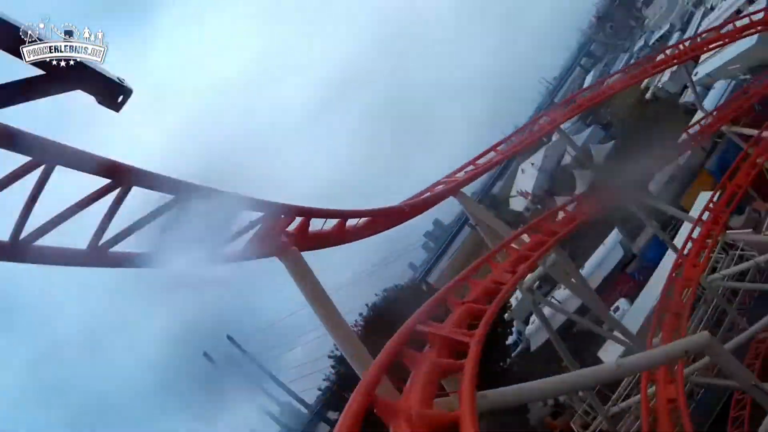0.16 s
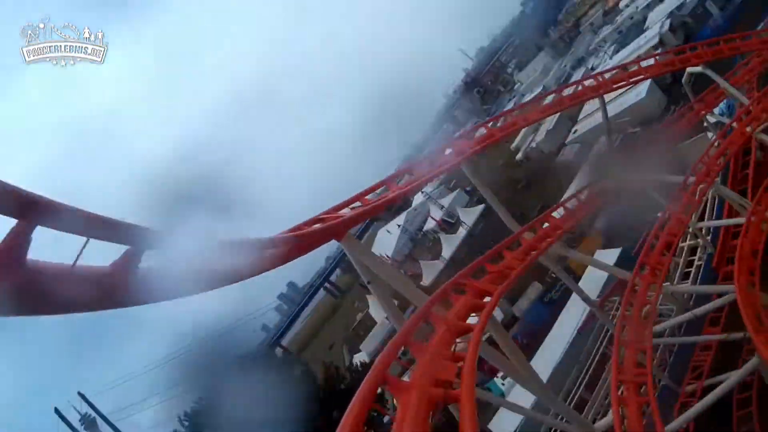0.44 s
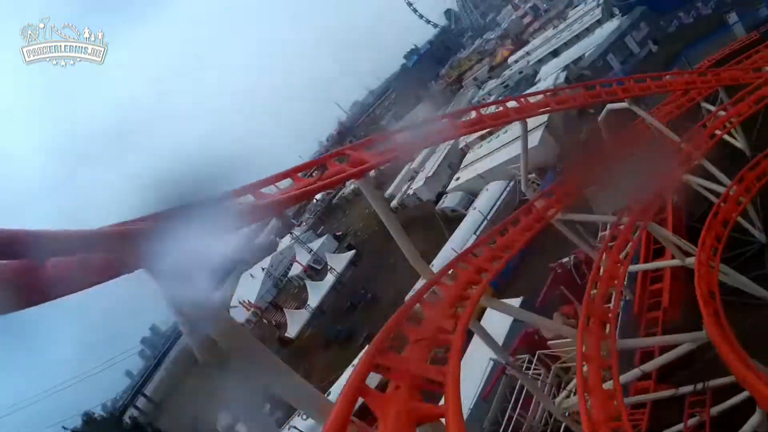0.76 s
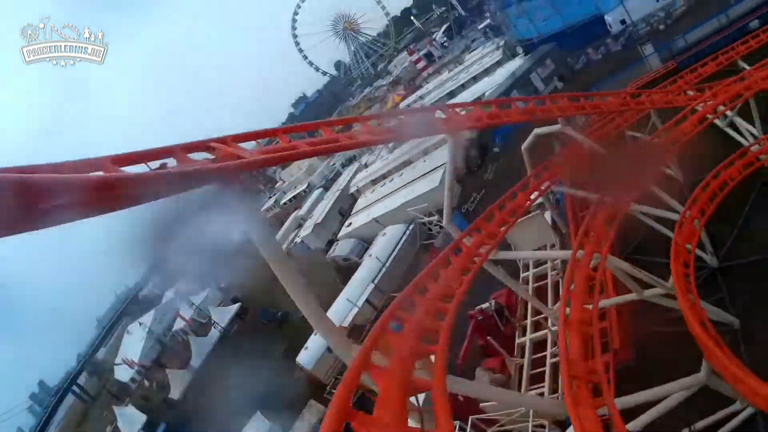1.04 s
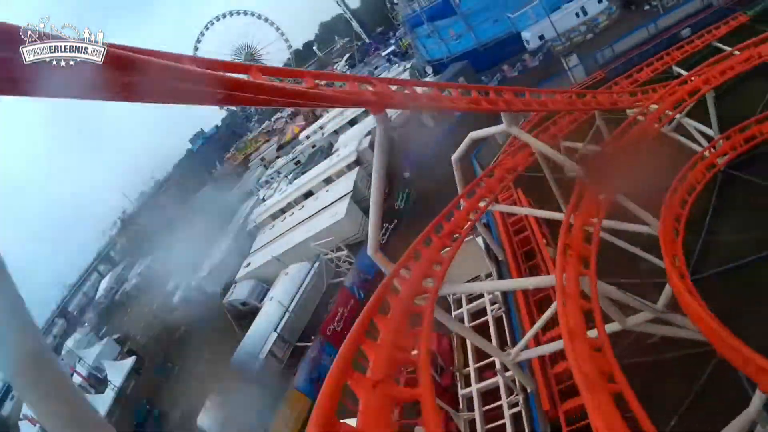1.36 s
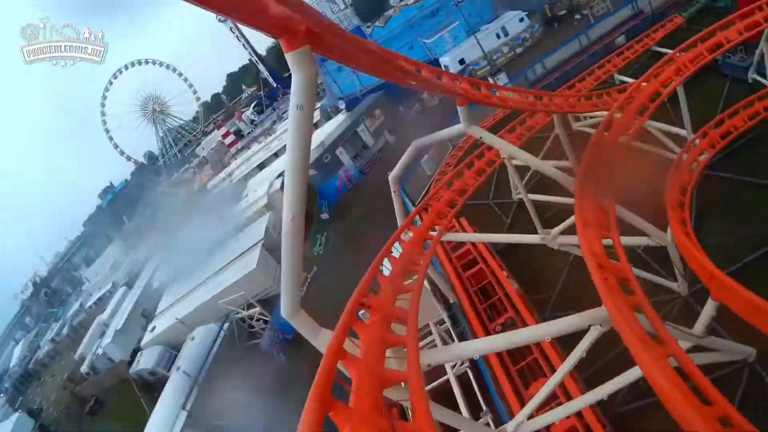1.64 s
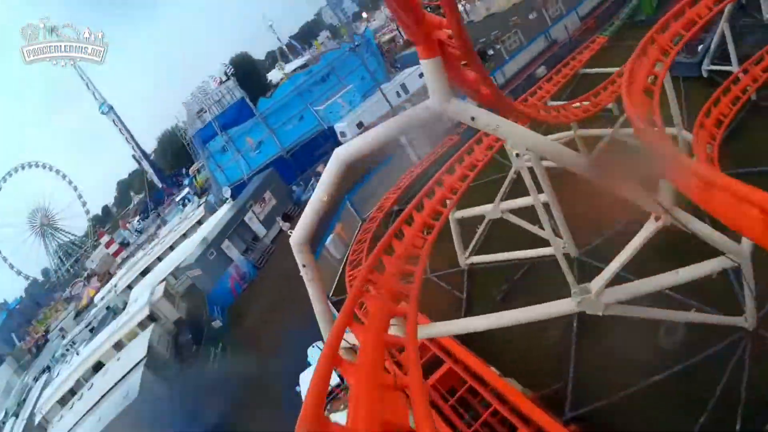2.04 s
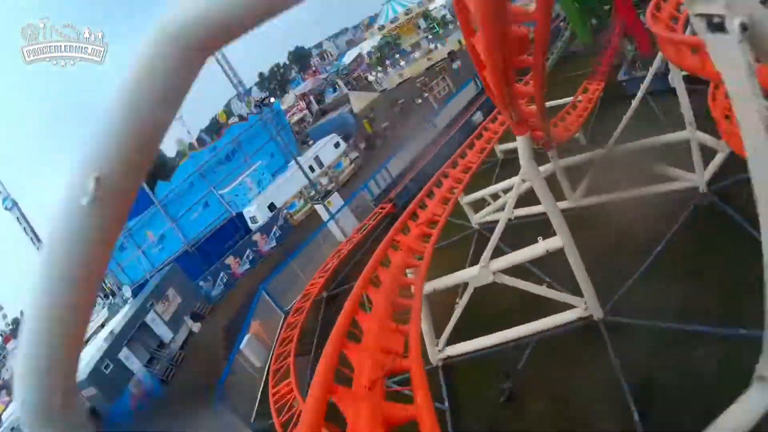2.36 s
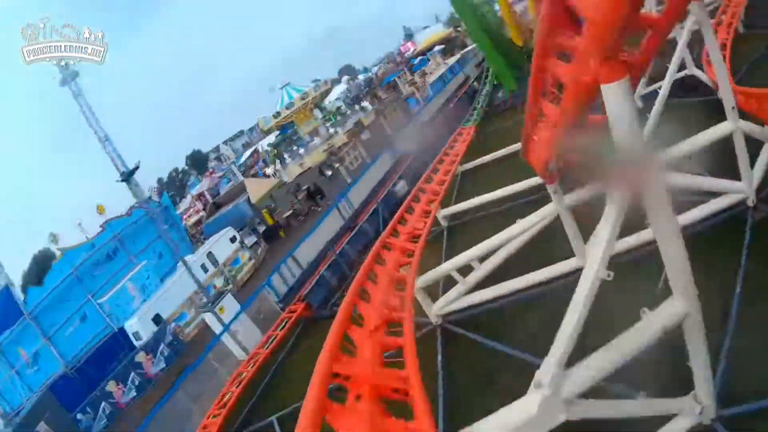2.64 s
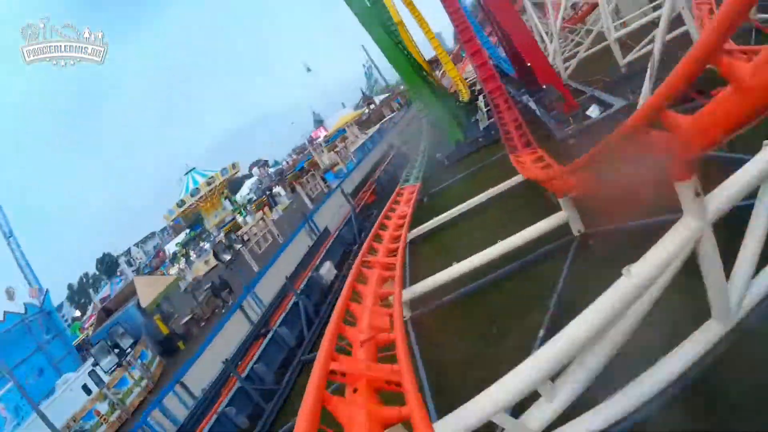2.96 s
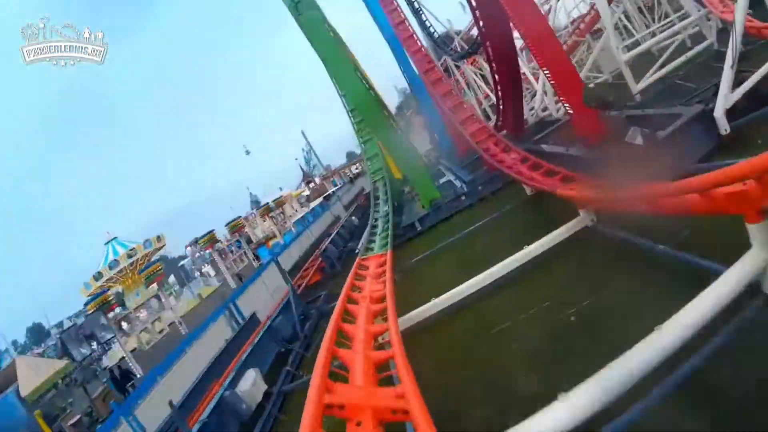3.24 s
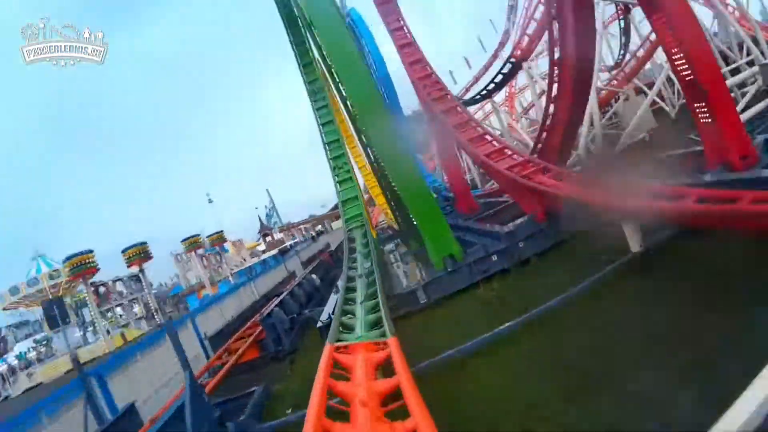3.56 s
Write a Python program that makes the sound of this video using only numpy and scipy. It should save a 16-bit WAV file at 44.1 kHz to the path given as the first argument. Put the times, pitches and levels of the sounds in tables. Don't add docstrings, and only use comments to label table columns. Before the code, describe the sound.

On-board roller coaster ride: deep, fluttering wind buffets a cased microphone from the start, over a quieter wheel roar and a faint rising whine in the first 1.5 s. Grit and fine rain tick on the plastic, with harder knocks near 0.24, 1.16, 1.47, 2.23 and 3.63 s. Blunt track thumps begin at 0.4 s, briefly choking the wind, and crowd together from 3.3 s as gusts strengthen, almost overloading.

```python
import sys
import numpy as np
from scipy import signal
from scipy.fft import rfft, irfft
from scipy.io import wavfile
from scipy.ndimage import uniform_filter1d

SR = 44100
rng = np.random.default_rng(int(sys.argv[2]) if len(sys.argv) > 2 else 0)


def bounce(signal):
    frames = np.transpose(np.atleast_2d(signal))
    limited = np.clip(frames, -1, 1)
    pcm = np.round(limited * 32767).astype(np.int16)
    wavfile.write(sys.argv[1], SR, pcm)


def gain_from_db(level_db):
    decades = np.asarray(level_db, float) / 20
    return 10 ** decades


N = 163170
LATE_S, CONTACT_S = 0.0012, 0.00045
CRACK_DB = 11


def col(table, k):
    a = np.array(table)
    return np.interp(np.arange(N) / SR, a[:, 0], a[:, k])


def unit(x):
    return x / np.sqrt(np.mean(x ** 2))


def walk(rate_per_s):
    k = int(SR / rate_per_s)
    held = np.repeat(rng.standard_normal(N // k + 1), k)
    slewed = uniform_filter1d(uniform_filter1d(held, k), k)[:N]
    return unit(slewed - uniform_filter1d(slewed, size=5 * k))


def bands(shape, low_hz, count):
    f = np.maximum(np.arange(N // 2 + 1) * SR / N, 1)
    s = np.array(shape)
    gain = gain_from_db(np.interp(np.log(f), np.log(s[:, 0]), s[:, 1], left=-60, right=-90))
    for hz in low_hz * 2 ** (np.arange(count) / 3):
        window = np.cos(np.clip(3 * np.log2(f / hz), -1, 1) * np.pi / 2)
        yield hz, irfft(rfft(rng.standard_normal(N)) * gain * window, N)


def add(out, start_s, x):
    i = int(start_s * SR)
    out[i:i + len(x)] += x[:max(N - i, 0)]


def ring(hz, t60_s, rise_s):
    t = np.arange(int(t60_s * SR)) / SR
    decay = np.exp(-t * np.log(1000) / t60_s)
    return np.sin(2 * np.pi * hz * t) * decay * (1 - np.exp(-t / rise_s))


def surge(octaves):
    # centre in seconds, swell in dB, half-width in seconds, brightening in dB per octave
    throws = [(0.242, 0, 0.14, 2), (0.431, 4.5, .04, -0.5), (0.601, 5.5, 0.039, -1.7),
              (1.011, 5.5, 0.051, 2.5), (1.142, 4.5, 0.037, -0.5), (1.447, 6.5, 0.018, 2.5),
              (1.68, 1.5, 0.067, 2), (1.779, 1, 0.04, 1.5), (1.978, 8.5, 0.036, 2.5),
              (2.091, 5, 0.046, -0.5), (2.39, 2.5, 0.022, 6), (2.519, 1.5, 0.014, 1.5),
              (2.772, 1.5, 0.019, 3.8), (3.09, 0.5, 0.03, 2.5), (3.359, 7, 0.014, 2.5),
              (3.459, 3.5, 0.019, 3), (3.592, 7.5, 0.019, 2)]
    t = np.arange(N) / SR
    return sum((db + tilt * octaves) * np.exp(-.5 * ((t - s) / w_s) ** 2) for s, db, w_s, tilt in throws)


def wind(eddy):
    # time in seconds, buffeting level in dB
    gust_levels = [
        (0.0, -16),
        (2.07, -15.5),
        (2.19, -15),
        (3.48, -12.5),
        (3.7, -9.5),
    ]
    # frequency in Hz, level in dB per Hz
    buffet_spectrum = [(13, -38), (22, -2), (87, 1.5), (278, -3.5), (387, -5.5), (538, -13.5), (597, -12.5),
                       (1240, -35), (1400, -37), (1820, -71), (3080, -120)]
    shared_db, near_db, own_db = 1.3, 1, 1
    sway_per_s, flicker_per_s = 35, 40
    eddy_from_hz, suction = 200, .12
    out, near, swell = 0, walk(sway_per_s), surge(0)
    tilt = surge(0.53) - swell
    for hz, x in bands(buffet_spectrum, 21.79, count=19):
        near = unit(0.53 * near + 0.9 * walk(sway_per_s))
        level_db = shared_db * eddy / (1 + eddy_from_hz / hz) + near_db * near
        level_db = level_db + own_db * walk(flicker_per_s)
        out = out + x * gain_from_db(level_db + swell + tilt * np.log2(hz / 186.0))
    calm_rms = np.sqrt(np.mean((out / gain_from_db(swell)) ** 2))
    out = out / calm_rms * gain_from_db(col(gust_levels, 1) - 0.56)
    bend = out ** 2
    return out - suction * (bend - uniform_filter1d(bend, size=2000))


def wheels(eddy):
    # frequency in Hz, level in dB per Hz
    roar_spectrum = [(530, -39), (900, -0.5), (1260, -18), (1520, -6), (2930, -21.5), (4350, -31),
                     (5200, -38), (14400, -43), (15500, -54.5)]
    # time in seconds, treble hiss in dB
    spray_levels = [
        (0, 2.5),
        (.42, 0.5),
        (.445, 5.5),
        (.47, -1.5),
        (1.9, -4),
        (2.4, -3),
        (3.17, 0.5),
        (3.7, 0),
    ]
    # time in seconds, frequency in Hz, level in dB
    whine_track = [
        (0, 940, -56),
        (.2, 955, -40),
        (.45, 975, -43),
        (.65, 1000, -43.5),
        (.8, 1030, -58),
        (1.1, 1105, -53),
        (1.2, 1130, -44.5),
        (1.42, 1200, -54),
        (1.6, 1260, -60.5),
        (3.7, 1500, -71),
    ]
    roar_db, rise_db_per_s, steady_hz = -45.5, 0.77, 4500
    case_hz, case_width_hz, case_lift = 4050, 310, 0.95
    shake_db = 0.4 * surge(2.8) + 0.44 * eddy + 1.5 * walk(80)
    shake_db = shake_db + rise_db_per_s * (np.arange(N) - N / 2) / SR
    hiss_db = col(spray_levels, 1)
    roar = 0
    for hz, x in bands(roar_spectrum, 897, count=13):
        top = (hz / steady_hz) ** 4
        lift = 1 + case_lift / (1 + ((hz - case_hz) / case_width_hz) ** 2)
        if True:
            lift = 1 + case_lift / (1 + ((hz - case_hz) / case_width_hz) ** 4)
        roar = roar + x * gain_from_db((shake_db + hiss_db * top) / (1 + top)) * lift
    whine_hz = col(whine_track, 1) * (1 + 0.0045 * walk(20))
    whine = np.sin(2 * np.pi * np.cumsum(whine_hz) / SR)
    return unit(roar) * gain_from_db(roar_db + 3.0) + whine * gain_from_db(col(whine_track, 2) + 4.2 * walk(19))


def crack(noise, colour_db):
    # frequency in Hz, width in Hz, level in dB
    upper_resonances = [(7700, 3300, 5), (10730, 2400, 1.5), (13200, 3000, -3.5)]
    burst_s = .00025
    t = np.arange(len(noise)) / SR
    f = np.arange(len(noise) // 2 + 1) * SR / len(noise)
    shape = 0
    for k, (hz, width_hz, db) in enumerate(upper_resonances):
        shape = shape + (-1) ** k * gain_from_db(db + colour_db[k]) / (1 + 1j * (f - hz) / (width_hz / 2)) ** 2
    x = irfft(rfft(noise * t * np.exp(-t / burst_s)) * shape, len(noise))
    return x / np.abs(x).max()


def ticks():
    # start in seconds, peak in dB, crack in dB, ring in Hz
    light_taps = [(.0603, -43.5, -8, 4600), (.0725, -44, -5, 4600), (.0965, -34.5, -22.5, 4120),
                  (.1905, -41.5, -5, 5250), (.2052, -42.5, -14, 4500), (.3446, -36, -23, 3900),
                  (.4098, -33.5, -12, 4500), (.4335, -42.5, -21.5, 3900), (.478, -37.5, -16, 4270),
                  (.9318, -45.5, -15, 3900), (1.0186, -46.5, -18, 4300), (.9712, -38.5, -27.5, 3870),
                  (1.056, -38.5, -27, 4100), (1.181, -37, -23, 4050), (1.4426, -39, -30, 3600),
                  (1.4998, -48, -10, 4800), (1.7818, -39.5, -10, 4400), (1.991, -42.5, -24.5, 3500),
                  (2.1114, -47.5, -17, 4360), (2.176, -36, -19, 3900), (2.3545, -43.5, -19, 4010),
                  (2.363, -43, -21.5, 3300), (2.381, -34, -29, 3620), (2.4014, -39, -23.5, 3940),
                  (2.4359, -42, -23, 3900), (2.4713, -43.5, -22.5, 4000), (2.5726, -47.5, -20.5, 4010),
                  (2.6017, -42, -25, 3980), (2.6808, -35, -15.5, 4230), (2.7826, -43, -22, 3600),
                  (2.795, -49.5, -5.5, 4800), (2.8463, -41.5, -7.5, 5600), (2.9223, -41, -12, 4800),
                  (2.9742, -38.5, -17.5, 3950), (3.0155, -48, -23, 4100), (3.0535, -42.5, -25, 4700),
                  (3.236, -32.5, -23, 4100), (3.264, -42.5, -18.5, 4300), (3.3488, -36.5, -23, 3300),
                  (3.436, -39, -26, 4200)]
    tap_db, tap_t60_s, scatter_db = 10, 0.0041, 3
    grit_per_s, grit_db, grit_spread_db = 110, -59, 2.5
    out = np.zeros(N)
    rows = list(light_taps)
    for a, b, c, d in rng.random((int(grit_per_s * N / SR), 4)):
        rows.append((a * N / SR, grit_db - grit_spread_db * np.log(b + .01), -14 - 16 * c, 3400 + 1300 * d))
    for (s, db, crack_db, hz), r in zip(rows, rng.standard_normal((len(rows), 387))):
        add(out, s + LATE_S, gain_from_db(db + tap_db) * ring(hz, tap_t60_s, CONTACT_S))
        add(out, s + LATE_S, gain_from_db(db + crack_db + CRACK_DB) * crack(r[:384], scatter_db * r[384:]))
    return out


def splats():
    # start in seconds, peak in dB, brightening in dB per resonance
    droplets = [(0.0187, -40, -7.5), (0.2953, -51.5, -2), (.4224, -47.5, 0), (0.4327, -26, 5),
                (.5033, -45.5, 1.5), (1.949, -50, -14), (2.197, -51, 0.5), (2.207, -48, -0.5),
                (2.468, -46, -1.5), (2.516, -48, 0.5), (2.731, -46, -1), (3.143, -54.5, -1.5),
                (3.4094, -44, -6.5), (3.436, -47, -3)]
    out = np.zeros(N)
    for (s, db, tilt_db), r in zip(droplets, rng.standard_normal((len(droplets), 384))):
        add(out, s + LATE_S, gain_from_db(db) * crack(r, tilt_db * np.arange(3)))
    return out


def drops():
    # start in seconds, peak in dB, low mode in dB, crack in dB, low mode in Hz
    heavy_drops = [(0.2216, -33.5, 2.5, -9, 2380), (0.2282, -29.5, -8.5, -21, 2220),
                   (0.2395, -23, -8.5, -21.5, 2320), (0.327, -29, -12, -27.5, 1860),
                   (0.8742, -37, 6.5, -10.5, 2460), (1.1153, -23.5, 6, -24.5, 1920),
                   (1.1455, -32, 1, -25, 1700), (1.1643, -16.5, -6.5, -30.5, 1810),
                   (1.4701, -17, 0, -21.5, 1845), (1.6747, -25, -17.5, -27.5, 1840),
                   (1.972, -40.5, 9.5, -16.5, 1770), (2.2272, -22, -6.5, -21.5, 2140),
                   (2.7207, -30, 4, -24, 2400), (2.758, -39, -12, -22, 1830), (3.0958, -37, 4, -33.5, 1900),
                   (3.1516, -25.5, 1.5, -13.5, 2430), (3.317, -33, 2.5, -16.5, 2370),
                   (3.4434, -30.5, 10, -8, 1860), (3.5748, -43.5, 6, -6.5, 1800),
                   (3.6302, -20.5, 0, -10.5, 2200), (3.668, -39.5, 9.5, -11.5, 2340),
                   (1.8908, -38.5, 5.5, -8, 2200), (3.6002, -60, 16, 0, 1700)]
    # first, third and fourth case mode in dB, crack brightening in dB per resonance
    mode_balance = [(-4, 11, -2, -2), (-4, -4, -20, -8.5), (0.5, -6.5, -22, -5.5), (-1, -19, -25, 0.5),
                    (5.5, 6.5, -14, -3), (-8, 7, -17.5, 4), (-7, 1, -12, 0.5), (-1.5, -3, -24, -9),
                    (-3, -14, -11.5, -13.5), (-5, -7, -23, -5), (5, -1.5, -5, -2.5), (3.5, -11, -13, 2),
                    (0, 9, -19, -11), (10, -6, -22, -8.5), (6, -6, -17, -13), (5.5, 0, -1.5, 0.5),
                    (7, 6.5, -10, -5), (-6, 4, 2, -5), (8, 2, -2, -3), (7, 10, -2, -2.5), (0, 7, -3, -1.5),
                    (-4, 13, -8, -5.5), (7, 3, 7, -0.5)]
    # frequency in Hz, level in dB, t60 in seconds
    case_modes = [(3296, 2.5, 0.0054), (4050, 1.5, 0.0086), (4620, 1, 0.0038), (5500, 2.5, .003)]
    low_mode_db, low_t60_s, detune, wind_mask_db = 17, 0.0038, .015, -38
    out = np.zeros(N)
    noise = rng.standard_normal((len(heavy_drops), 400))
    for (s, db, low_db, crack_db, low_hz), (first, third, fourth, tilt_db), r in zip(
            heavy_drops, mode_balance, noise):
        low_db -= 12 / (1 + gain_from_db(db + low_db - wind_mask_db) ** 2)
        add(out, s + LATE_S, gain_from_db(db + low_db + low_mode_db) * ring(low_hz, low_t60_s, CONTACT_S))
        modes = zip(case_modes, r[-4:], (first, 0, third, fourth))
        for k, ((hz, mode_db, t60_s), off, extra_db) in enumerate(modes):
            mode = ring(hz * (1 + detune * off), t60_s, CONTACT_S)
            add(out, s + LATE_S, (-1) ** k * gain_from_db(db + mode_db + extra_db) * mode)
        add(out, s + LATE_S, gain_from_db(db + crack_db + CRACK_DB) * crack(r[:384], tilt_db * np.arange(3)))
    return out


def jolts():
    # time in seconds, peak in dB, ring in Hz, push +1 or pull -1
    joints = [(0.4095, -7, 150, -1), (0.5255, -2.5, 173, -1), (0.7022, -3.5, 150, -1),
              (0.9594, -6, 204, -1), (1.0251, 0, 270, -1), (1.057, -5, 168, -1), (1.2158, -4.5, 256, -1),
              (1.4451, -1.5, 130, 1), (1.6755, -1, 285, -1), (1.9144, -1.5, 258, -1),
              (1.9772, -0.5, 141, 1), (2.0456, -3, 149, 1), (2.2039, -3.5, 260, -1),
              (2.7015, -3.5, 240, -1), (2.9774, -1, 226, -1), (3.3093, -4, 322, -1), (3.3229, 2, 237, -1),
              (3.346, -6.5, 172, -1), (3.357, -1.5, 107, -1), (3.441, -4, 200, -1), (3.469, -9, 220, -1),
              (3.5736, -5.5, 321, -1), (3.577, 0, 353, -1), (3.5954, -10.5, 203, -1), (3.6019, 5, 265, -1),
              (3.608, 1.5, 315, 1), (3.6694, -1, 165, -1)]
    jolt_cycles, hush, hush_cycles = .5, .85, .8
    t, out, left = np.arange(N) / SR, np.zeros(N), np.ones(N)
    for s, db, hz, way in joints:
        turns = (t - s) * hz
        out += way * gain_from_db(db) * np.cos(2 * np.pi * turns) * np.exp(-.5 * (turns / jolt_cycles) ** 2)
        left *= 1 - hush * np.exp(-.5 * (turns / hush_cycles) ** 2)
    return out, left


def scene():
    eddy = walk(70)
    thumps, left = jolts()
    return (wind(eddy) * left + wheels(eddy) + ticks() + splats() + drops() + thumps)[None]


def top_cut(x):
    return signal.sosfilt(signal.butter(12, 15710, fs=SR, output="sos"), x)


def record(dry):
    ceiling, knee = .975, 30
    mix = dry / (1 + (dry / ceiling) ** knee) ** (1 / knee)
    return top_cut(mix)


dry = scene()
out = record(dry)
bounce(out)
```